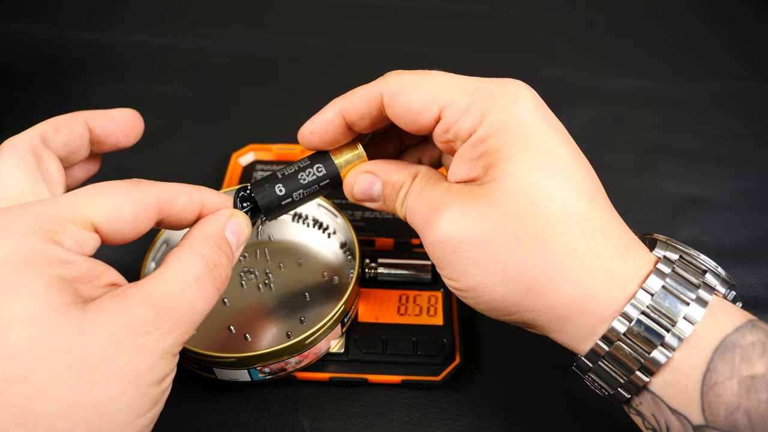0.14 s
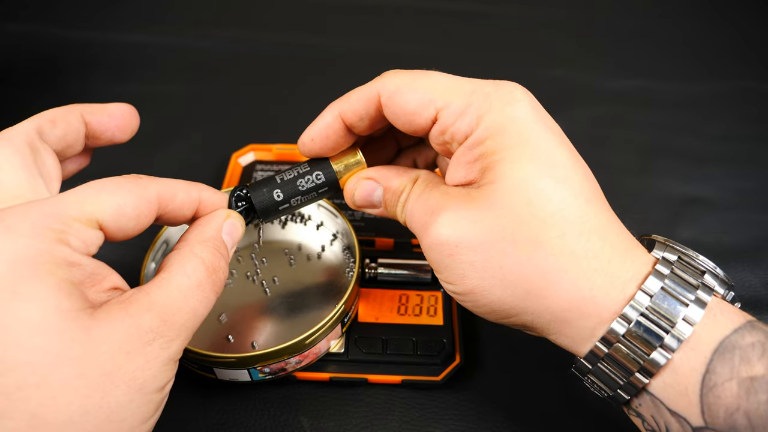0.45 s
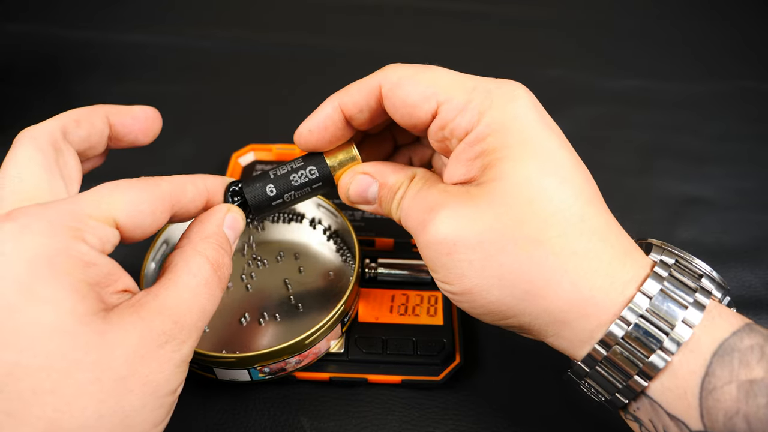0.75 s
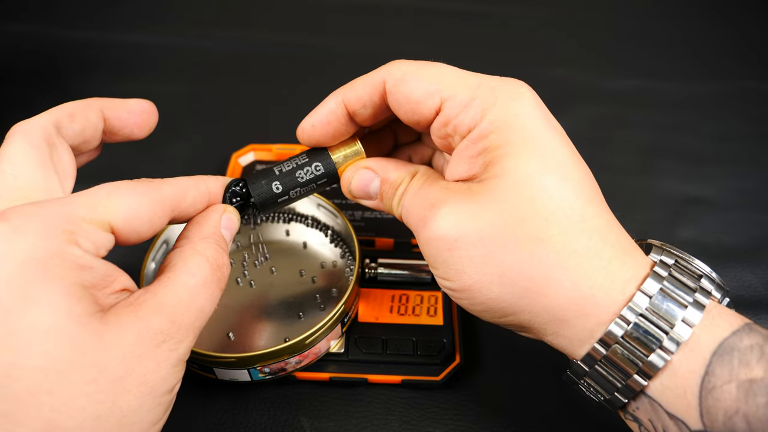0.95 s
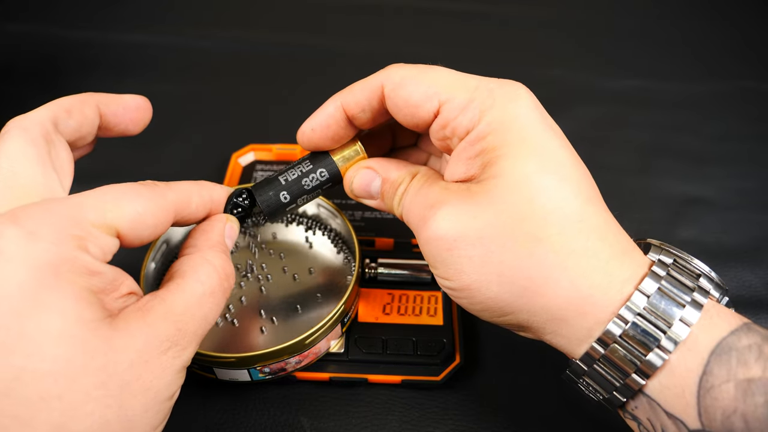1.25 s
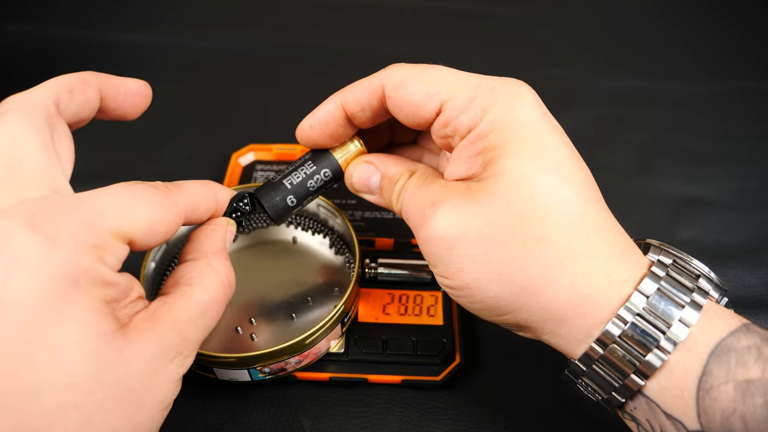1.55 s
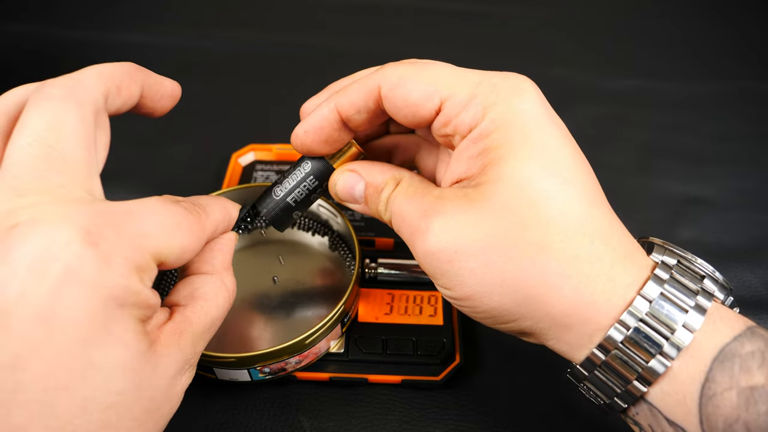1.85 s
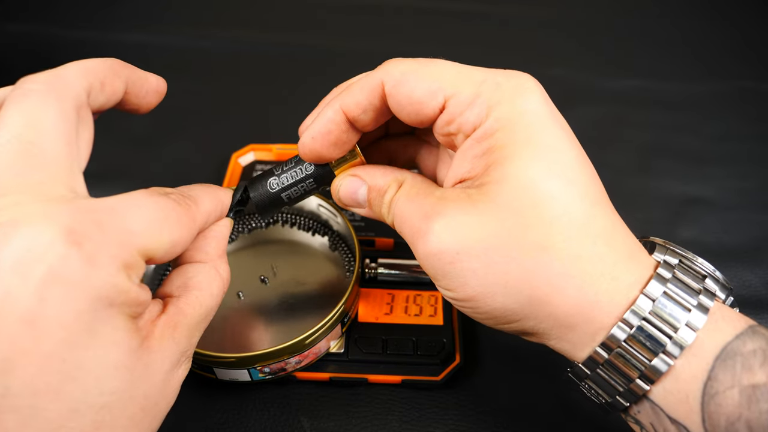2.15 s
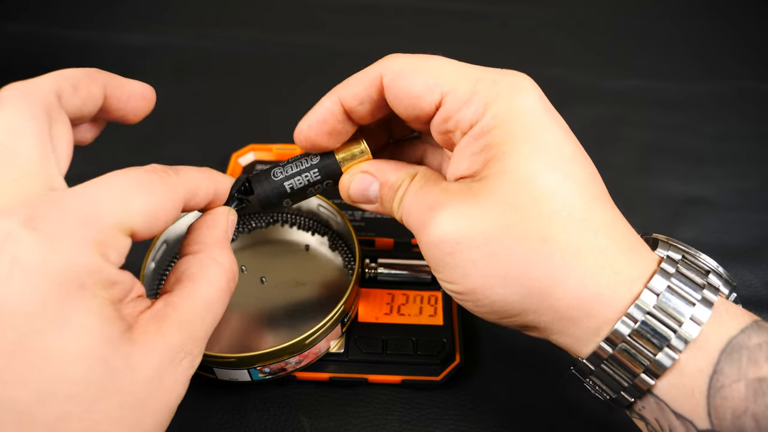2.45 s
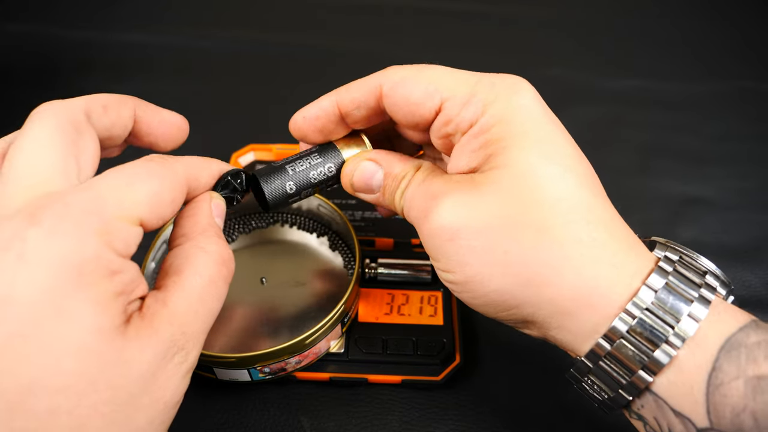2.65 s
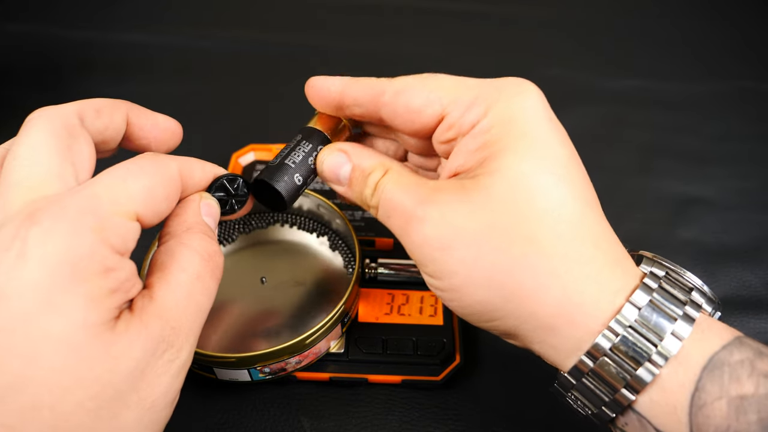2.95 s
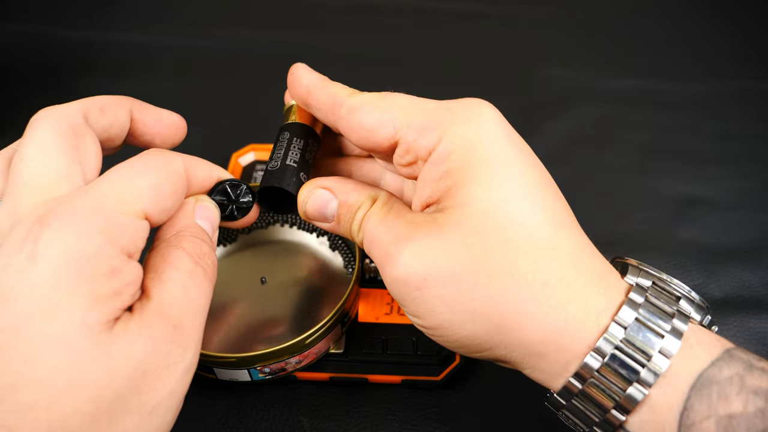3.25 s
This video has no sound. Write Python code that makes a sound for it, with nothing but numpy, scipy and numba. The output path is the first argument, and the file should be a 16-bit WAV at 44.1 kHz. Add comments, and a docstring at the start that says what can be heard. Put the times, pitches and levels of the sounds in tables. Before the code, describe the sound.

Small lead pellets pour from an opened cartridge into a thin metal tin, rattling brightly

```python
"""A small room: small lead pellets pour from an opened cartridge into a thin metal tin, close to the microphone.
Each blow rings the tin's strong modes and a noise crowd of short ones; bounces and rolls are random streams
of small blows. The last few pellets are tapped out, a finger softly touches the tin, thin sine squeaks swell.
Decaying noise makes the room's answer, over a quiet wavering hum of sines and coloured air noise."""
import sys
import numpy as np
from scipy import signal
from scipy.fft import rfft, irfft
from scipy.io import wavfile
from scipy.ndimage import uniform_filter1d, map_coordinates
from numba import njit

SR = 44100
rng = np.random.default_rng(int(sys.argv[2]) if len(sys.argv) > 2 else 0)


def wav_record(signal):
    """Record a signal, one row per channel, as 16-bit PCM in the file named by sys.argv[1]."""
    frames = np.transpose(np.atleast_2d(signal))
    bounded = np.clip(frames, -1, 1)
    # unit amplitude maps onto the largest positive 16-bit level
    quanta = np.round(bounded * 32767).astype(np.int16)
    wavfile.write(sys.argv[1], SR, quanta)


def convert_level_to_amplitude(level_db):
    """Map a level in decibels to its linear amplitude factor."""
    exponent = np.asarray(level_db, float) / 20
    return 10 ** exponent


N = 149940  # samples, 3.4 s
LEFT_RIGHT = np.array([[1], [-1]])  # opposite signs in the two channels


def read(table, at, log=False):
    """Straight lines through the first two columns of a table."""
    x, y = np.array(table, float).T[:2]
    return np.interp(np.log(at), np.log(x), y) if log else np.interp(at, x, y)


def colour(x, table):
    """Equalise a signal along a (frequency [Hz], level [dB]) curve."""
    hz = np.maximum(np.arange(len(x) // 2 + 1) * SR / len(x), 1)
    return irfft(rfft(x) * convert_level_to_amplitude(read(table, hz, True)), len(x))


def low_cut(x, hz, order):
    """Butterworth high-pass."""
    return signal.sosfilt(signal.butter(order, hz, "high", fs=SR, output="sos"), x)


# strong modes of the tin: (frequency [Hz], relative level [dB], decay by 60 dB [s])
TIN_MODES = [(680, -22, .05), (793, -14, .06), (825, -19, .06), (995, -14, .04), (1195, -2, .065),
             (1215, -5, .06), (1258, -4, .06), (1678, -9, .05), (2060, -18, .05), (2300, -14, .05),
             (2475, -8, .07), (3292, -9, .08), (3318, -9, .08), (3900, -5, .02), (4015, -7, .25),
             (4352, -7.5, .12), (4460, -12, .1), (4914, -9, .15), (4977, -7, .2), (5111, -6.5, .17),
             (5237, -7.5, .18), (6255, -9, .12), (7390, -17, .05), (7830, -16, .05), (8720, -9, .065),
             (8840, -11, .05), (10465, -6.5, .035), (11000, -12, .024), (12900, -18, .03),
             (14150, -15, .028)]


def strong_modes(blows):
    """The tin's long resonances: each blow kicks every mode, by an amount that depends on where it lands."""
    tin_db, spot_scatter_db = -21.5, 3.5
    detune = 0.0008  # typical relative pitch wander: loose pellets detune the modes
    hz, mode_db, t60 = np.array(TIN_MODES).T
    at, band_db = blow_levels(blows)
    spot, polarity = rng.standard_normal((2, len(blows), len(hz)))
    spot_db = spot_scatter_db * np.clip(spot, -2, 2)
    ring_db = blows[:, 4:]
    gain = convert_level_to_amplitude(band_db[:, band(hz)] + mode_db + tin_db + ring_db + spot_db) * np.sign(polarity)
    # averaging 16 values divides their spread by 4
    wobble = detune * 4 * uniform_filter1d(rng.standard_normal((len(hz), N // 64 + 1)), size=16)
    pole = 2j * np.pi * hz / SR - np.log(1000) / (t60 * SR)
    return tin_low_cut(ring(at, gain, pole, wobble)[:N])


@njit
def ring(at, gain, pole, wobble):
    """Decaying resonators: every blow kicks every mode with its own gain; the pitch wanders a little."""
    out = np.zeros(wobble.shape[1] * 64)
    for m in range(len(pole)):
        z, k = 0j, 0
        for i in range(len(out)):
            if i % 64 == 0:
                p = np.exp(pole[m] + 1j * pole[m].imag * wobble[m, i // 64])
            z = z * p + 1e-18
            while k < len(at) and at[k] == i:
                z += gain[k, m]
                k += 1
            out[i] += z.imag
    return out


# colour of the close, short modes between the strong ones: (frequency [Hz], relative density [dB per Hz])
CROWD_COLOUR = [(350, -58.5), (600, -50), (790, -5), (906, -12), (1210, -5), (1430, -10), (2000, -7),
                (2400, -5), (2800, -11.5), (3300, -4.5), (4400, -4.5), (5050, -2.5), (5700, -4.5),
                (8700, -7), (10700, -6.5), (11700, -9), (14500, -7.5), (15400, -16.5), (16000, -48)]


def mode_crowd(blows):
    """Modes too close to tell apart: each blow lets out noise, a short crack plus a longer, softer clash."""
    crowd_db, rise_s = -7.5, .0006
    crack_t60_s, clash_t60_s, clash_db = .011, 0.081, -9
    # while the stream pours, pellets land among others: a softer crack than a lone pellet's
    pour_ends_s, cushion_db = 1.49, -3
    at, band_db = blow_levels(blows)
    noise = rfft(colour(rng.standard_normal(N), CROWD_COLOUR))
    noise = noise / irfft(noise, N).std()
    noise_band = band(np.arange(len(noise)) * SR / N)
    t = np.arange(SR // 4) / SR
    rise = 1 - np.exp(-t / rise_s)
    crack = rise * convert_level_to_amplitude(-60 * t / crack_t60_s)
    clash = rise * convert_level_to_amplitude(clash_db - 60 * t / clash_t60_s)
    lone = blows[:, 0] > pour_ends_s
    out = 0
    for k in range(3):
        power = 0  # overlapping blows add in power
        for who, crack_db in ((lone, 0), (~lone, cushion_db)):
            hits = np.bincount(at, who * convert_level_to_amplitude(2 * band_db[:, k]), N + SR)
            power = power + signal.fftconvolve(hits, (convert_level_to_amplitude(crack_db) * crack + clash) ** 2)[:N]
        part = irfft(noise * (noise_band == k), N)
        out = out + convert_level_to_amplitude(crowd_db) * np.sqrt(np.maximum(power, 0)) * part
    return tin_low_cut(out)


def band(hz):
    """Low, middle or high modes of the tin: 0, 1 or 2."""
    return (hz > 2900) * 1 + (hz > 7000)


def blow_levels(blows):
    """Sample at which each blow sounds, and its level in the low, middle and high modes."""
    late_s, most_extra_db = .0008, 14
    at = ((blows[:, 0] + late_s) * SR).astype(np.int64)
    extra = np.clip(blows[:, 2:4], -most_extra_db, most_extra_db)
    return at, blows[:, 1:2] + np.c_[extra[:, 0], 0 * at, extra[:, 1]]


def tin_low_cut(x):
    """The thin tin gives little in the lows: a steep high-pass at 740 Hz."""
    return low_cut(x, 740, 8)


# clear pellet landings: (time [s], relative level [dB], extra of the low modes [dB], extra of the high modes [dB])
PELLET_LANDINGS = [(0.02, -32, 4, -2.5), (0.043, -22.5, 2.5, -11), (0.057, -10.5, -5.5, -1.5),
                   (0.077, -9.5, 0, -6), (0.119, -13, 3.5, -1.5), (0.126, -15.5, 3, 5),
                   (0.145, -19, 2.5, -14.5), (0.155, -9.5, 4, 1.5), (0.194, -22, 5.5, -14.5),
                   (0.202, -10.5, 3, 0.5), (0.221, -11.5, 1.5, -9), (0.244, -10, -1.5, 4),
                   (0.256, -10, 1.5, -4), (0.304, -8.5, 3.5, 2), (0.332, -12.5, -5, -4.5),
                   (0.342, -14, 7, 5), (0.358, -11.5, -4, -3.5), (0.374, -16, -5.5, -1.5),
                   (0.399, -18, -6.5, -1), (0.419, -9.5, 1, 0.5), (0.437, -7, -1, 2.5),
                   (0.462, -13, -2.5, 6), (0.479, -9, 4.5, -1.5), (0.502, -19.5, 7.5, -4),
                   (0.519, -12.5, 2.5, -6), (0.536, -9.5, 4.5, 4.5), (0.597, -19, -11, -10),
                   (0.618, -11, 1, 4), (0.622, -15, 7.5, 1.5), (0.639, -8.5, -4.5, 0.5),
                   (0.678, -10, 0.5, -7.5), (0.696, -10.5, -6, 3), (0.713, -8, -2.5, -0.5),
                   (0.737, -20, -0.5, 0), (0.754, -14, 0.5, 0), (0.766, -5.5, -7, -1), (0.79, -12, 4.5, 2),
                   (0.808, -12.5, -1.5, 1), (0.835, -13, 3, 6), (0.86, -15, 6.5, 0), (0.884, -8.5, -0.5, 2),
                   (0.895, -11.5, -1.5, -6.5), (0.913, -15, 6.5, 5.5), (0.928, -9.5, -2.5, 1),
                   (0.961, -22.5, -9, -6), (0.979, -17, -16.5, 4.5), (0.986, -11, -2, 1.5),
                   (0.994, -13, 3, -8), (1.038, -13.5, -2.5, -13.5), (1.047, -10.5, 2.5, 4.5),
                   (1.057, -20, -7, -11), (1.077, -6.5, -2.5, 2.5), (1.119, -11, 4.5, 7),
                   (1.128, -10.5, 2, 3.5), (1.153, -8, 7, 4), (1.185, -13, 8, 8), (1.202, -11, -2, -3.5),
                   (1.227, -30.5, -3.5, -7), (1.249, -15, 0.5, 10), (1.257, -8.5, 4, -2),
                   (1.304, -12, 1.5, 0.5), (1.329, -17.5, 1, -2), (1.355, -18.5, 9, 10),
                   (1.365, -17, 0.5, 0.5), (1.393, -19, 3.5, 6.5), (1.429, -18, 6, 11),
                   (1.443, -14, -4.5, -1), (1.465, -30, 12, 10), (1.511, -18, 2.5, 7),
                   (1.953, -12.5, 1.5, -0.5), (1.976, -12.5, 0.5, 1.5), (2.009, -17, -1.5, -2),
                   (2.014, -15, -4, -1), (2.04, -13, 3.5, 0), (2.2, -12.5, 1, 1.5), (2.262, -14, 2, 0)]


def landings():
    """Single pellets striking the tin; the added last column leaves the strong modes at full ring."""
    return np.c_[np.array(PELLET_LANDINGS, float), np.zeros(len(PELLET_LANDINGS))]


# stream of bouncing pellets, before its lift and scatter: (time [s], level [dB])
BOUNCE_CURVE = [(0.0, -25), (0.08, -29.5), (0.11, -40), (0.12, -30), (0.374, -26.5), (0.386, -28.5),
                (0.422, -25), (0.556, -23.5), (0.588, -32), (0.632, -25), (1.046, -31), (1.086, -18),
                (1.104, -27), (1.184, -21.5), (1.448, -25), (1.6, -70)]


def bounces():
    """Pellets bouncing in the tin: 750 small blows a second."""
    return stream(BOUNCE_CURVE, 750, lift_db=.5, scatter_db=3, low_db=0, high_db=0, ring_db=0)


# stream of rolling and settling pellets, before its scatter: (time [s], level [dB])
ROLL_CURVE = [(1.5, -37.5), (1.6, -45.5), (1.7, -52.5), (1.78, -54), (1.86, -56), (1.92, -69), (1.935, -42),
              (1.952, -32), (2.0, -40.5), (2.13, -61), (2.18, -46), (2.198, -39.5), (2.3, -45), (2.37, -79),
              (2.46, -65), (2.55, -56.5), (2.62, -62.5), (2.74, -67), (2.79, -56.5), (2.84, -70.5),
              (2.88, -75), (3.4, -80)]


def rolls():
    """Pellets rolling and settling: 800 small blows a second, which wake the strong modes less."""
    return stream(ROLL_CURVE, 800, lift_db=0, scatter_db=4, low_db=-4, high_db=-3, ring_db=-4.5)


def stream(curve, rate, lift_db, scatter_db, low_db, high_db, ring_db):
    """Small blows at random times, their strength following a curve; columns as landings() gives them."""
    colour_scatter_db = 4
    gap, size, low, high = rng.random((4000, 4)).T
    s = curve[0][0] - np.cumsum(np.log(gap)) / rate
    size = np.minimum(-np.log(size), 3.)  # many small, few big
    level = read(curve, s) + lift_db + scatter_db * size
    low = low_db + colour_scatter_db * (2 * low - 1)
    high = high_db + colour_scatter_db * (2 * high - 1)
    return np.c_[s, level, low, high, 0 * s + ring_db][s < curve[-1][0]]


# soft finger touches: (time [s], relative level [dB], extra of the low modes [dB], extra of the high modes [dB])
FINGER_TOUCHES = [(3.25, -66, 14, -14), (3.262, -65, 14, -14), (3.278, -68, 14, -14), (2.62, -68, 10, -10)]


def touches():
    """A finger touching the tin: very soft blows, strong in the low modes and weak in the high ones."""
    return np.c_[np.array(FINGER_TOUCHES, float), np.zeros(len(FINGER_TOUCHES))]


# faint thin squeaks: (start [s], length [s], frequency [Hz], level [dB])
THIN_SQUEAKS = [(3.05, .11, 4620, -72), (3.16, .06, 4620, -77), (2.68, .11, 3850, -71)]


def squeaks():
    """Thin squeaks: steady sines that swell and fade along half a sine."""
    t = np.arange(N) / SR
    out = np.zeros(N)
    for start, length, hz, db in THIN_SQUEAKS:
        swell = np.sin(np.pi * np.clip((t - start) / length, 0, 1))
        out += convert_level_to_amplitude(db) * swell * np.sin(2 * np.pi * hz * t)
    return out


# decay of the room's shared part: (frequency [Hz], decay by 60 dB [s])
ROOM_DECAY = [(500, 0.41), (1500, 0.52), (4000, 0.49), (9000, 0.4), (14000, 0.19)]
# tilt of the room's wide part: (frequency [Hz], relative level [dB])
ROOM_WIDE_TILT = [(500, 13), (1000, -2.5), (4000, -2.5), (9000, -2.5), (13000, 5)]


def room(x):
    """Decaying noise in half-octave bands, a shared part and a part that differs left and right."""
    room_db, wide_db = -4.5, -6
    # the wide part is the near reflections: early and short
    gap_s, wide_gap_s, wide_t60_share = 0.0034, 0.00046, 0.51
    # a random wander of the echo path blurs steady tones in the room's tail: its size, and how fast
    wander_s, wander_hz = .0003, 40
    t = np.arange(SR) / SR
    tails = np.zeros((2, SR))
    for hz in 400 * 2 ** np.arange(0, 5.6, .5):
        edges = [hz / 2 ** .25, min(hz * 2 ** .25, 21000)]
        sos = signal.butter(2, edges, "band", fs=SR, output="sos")
        t60 = read(ROOM_DECAY, hz, True) * np.array([[1], [wide_t60_share]])
        tails += signal.sosfilt(sos, rng.standard_normal((2, SR))) * convert_level_to_amplitude(-60 * t / t60)
    tails *= (t > np.array([[gap_s], [wide_gap_s]])) / np.sqrt(np.sum(tails[0] ** 2))
    parts = []
    for tail in tails:
        wander = map_coordinates(rng.standard_normal(400), [np.arange(N) / SR * wander_hz])
        echo = signal.fftconvolve(x, tail)[:N]
        parts.append(map_coordinates(echo, [np.arange(N) + wander_s * SR * wander]))
    shared, wide = parts
    return convert_level_to_amplitude(room_db) * (shared + convert_level_to_amplitude(wide_db) * colour(wide, ROOM_WIDE_TILT) * LEFT_RIGHT)


# partials of the hum, before their waver: (frequency [Hz], rms level [dB])
HUM_PARTIALS = [(199.2, -67), (301.5, -64.5), (495.3, -68.5), (592.2, -77), (678.3, -77)]


def hum():
    """A quiet hum: sines, each wavering in level by itself, with a small phase offset between the channels."""
    waver_db, waver_hz = 3, 5.2  # typical waver; new random values a second
    offset = convert_level_to_amplitude(-24.5) * LEFT_RIGHT  # radians
    t = np.arange(N) / SR
    out = np.zeros((2, N))
    for hz, db in HUM_PARTIALS:
        waver = np.interp(t * waver_hz, np.arange(60), rng.standard_normal(60))
        phase = 2 * np.pi * (hz * t + rng.random())
        out += np.sqrt(2) * convert_level_to_amplitude(db + waver_db * waver) * np.sin(phase + offset)
    return out


# colour of the air noise: (frequency [Hz], relative density [dB per Hz])
AIR_COLOUR = [(18, -64), (30, -20.5), (189, -10), (245, -11.5), (295, -10.5), (374, -18.5), (486, -12.5),
              (962, -20.5), (1190, -20.5), (2010, -28.5), (2480, -31), (16000, -40)]
# width of the air noise: (frequency [Hz], side against mid [dB])
AIR_WIDTH = [(60, -16.5), (300, -26), (1000, -18.5), (4000, -4.5), (14000, -2)]


def air():
    """Room air: steady coloured noise, mostly shared by the channels in the lows, wider in the treble."""
    mid, side = (colour(rng.standard_normal(N), AIR_COLOUR) for _ in range(2))
    return (mid + colour(side, AIR_WIDTH) * LEFT_RIGHT) * convert_level_to_amplitude(-60.5) / mid.std()


def scene():
    """Pellets and finger on the tin, squeaks, the room's answer, hum and air."""
    blows = np.r_[landings(), touches(), bounces(), rolls()]
    blows = blows[np.argsort(blows[:, 0], kind="stable")]
    modes, crowd = strong_modes(blows), mode_crowd(blows)
    # the strong modes beam up at the microphone, less into the room
    echoes = room(convert_level_to_amplitude(-10) * modes + crowd)
    left_over_right_db = -.5
    balance = convert_level_to_amplitude(left_over_right_db / 2 * LEFT_RIGHT)
    return (modes + crowd + squeaks() + echoes + hum() + air()) * balance


def low_band_drop(x):
    """The 120-650 Hz band empties while the sound is loud."""
    low_hz, high_hz, drop_db = 120, 650, -40
    threshold_db, watch_s = -36, .035
    power = uniform_filter1d(x.mean(0) ** 2, int(watch_s * SR))
    drop = uniform_filter1d(1. * (power > convert_level_to_amplitude(2 * threshold_db)), size=800)  # soft edges
    hz = np.arange(N // 2 + 1) * SR / N
    lows = irfft(rfft(x) * ((hz > low_hz) & (hz < high_hz)), N)
    return x - drop * (1 - convert_level_to_amplitude(drop_db)) * lows


def roll_off(x):
    """The treble ends steeply here."""
    return signal.sosfilt(signal.butter(12, 16440, fs=SR, output="sos"), x)


def record(dry):
    """The microphone's low cut at 30 Hz, then the drop of the low band under loud sound."""
    mix = low_band_drop(low_cut(dry, 30, 2))
    return roll_off(mix)


dry = scene()
out = record(dry)
wav_record(out)
```